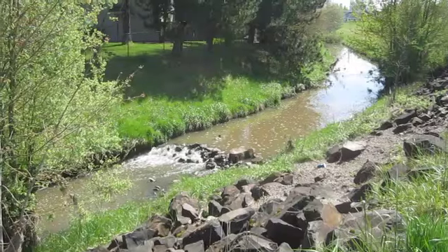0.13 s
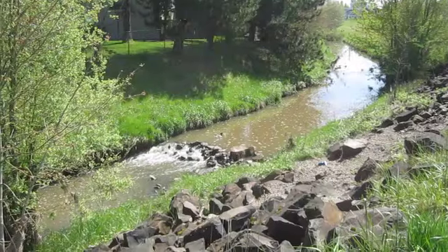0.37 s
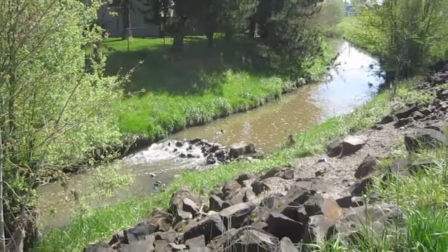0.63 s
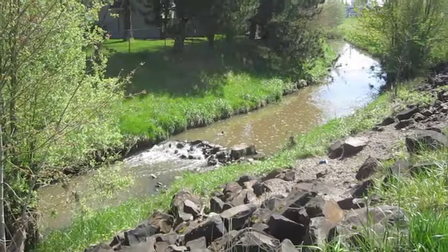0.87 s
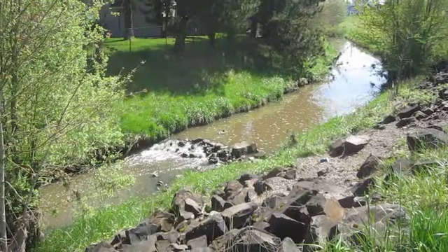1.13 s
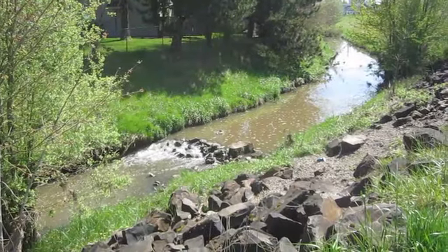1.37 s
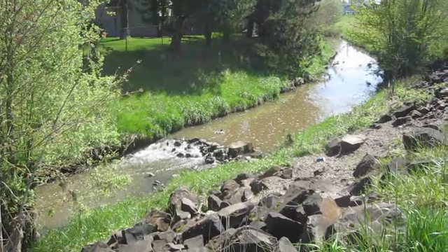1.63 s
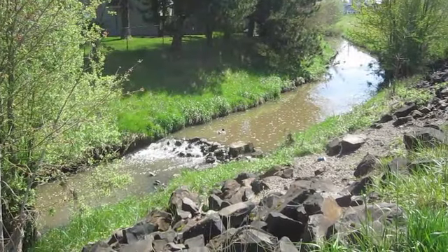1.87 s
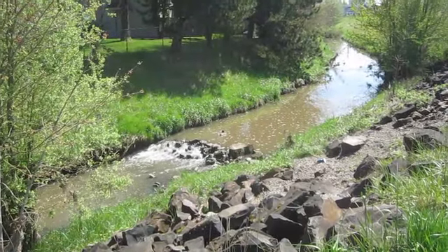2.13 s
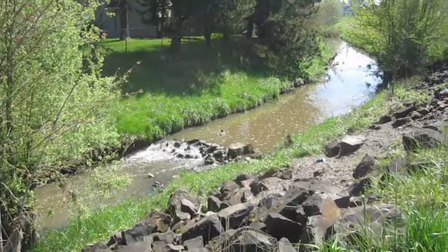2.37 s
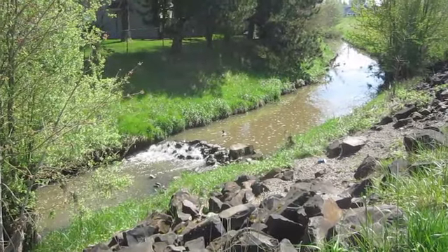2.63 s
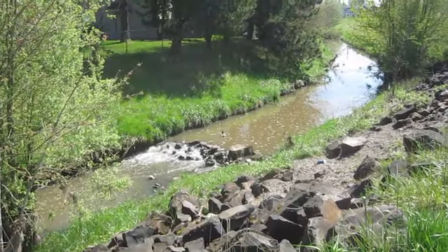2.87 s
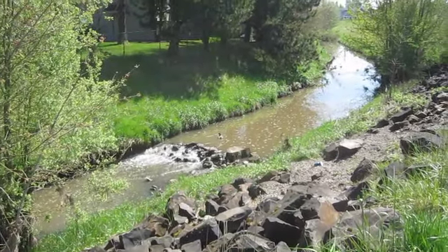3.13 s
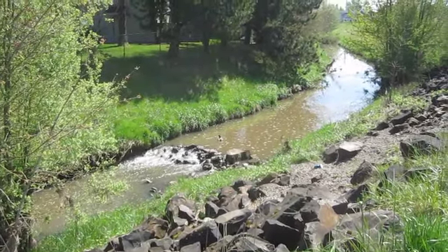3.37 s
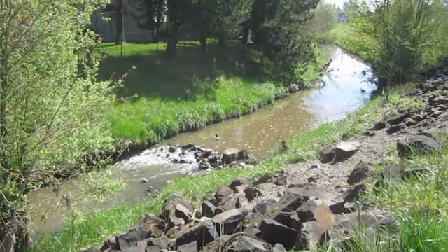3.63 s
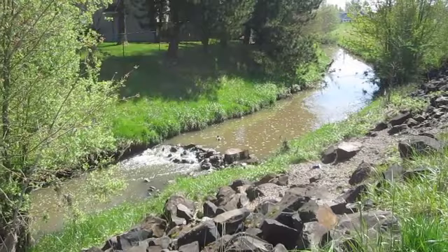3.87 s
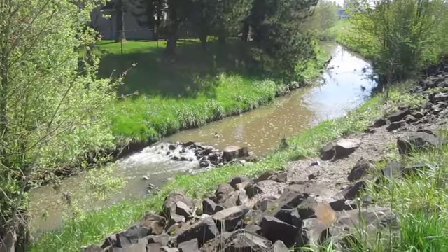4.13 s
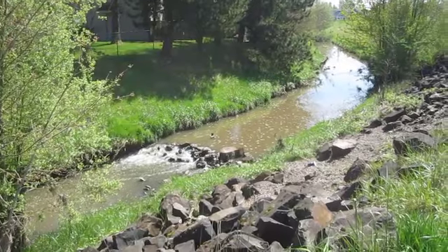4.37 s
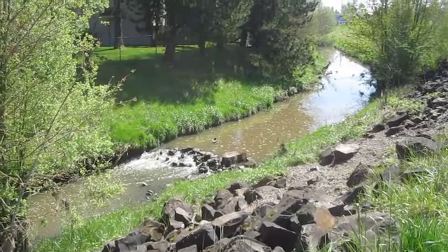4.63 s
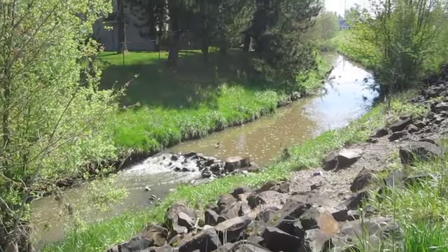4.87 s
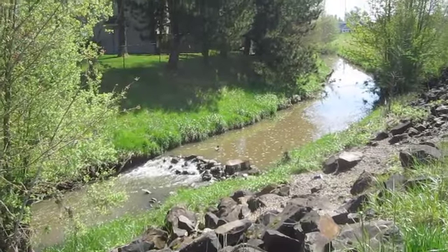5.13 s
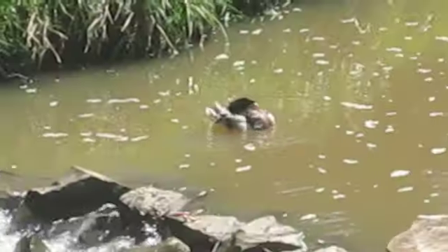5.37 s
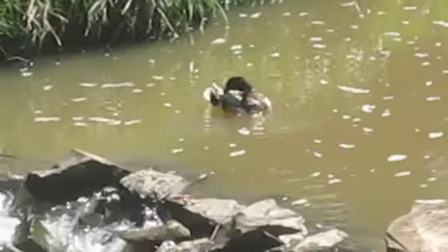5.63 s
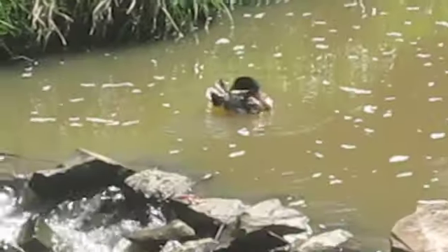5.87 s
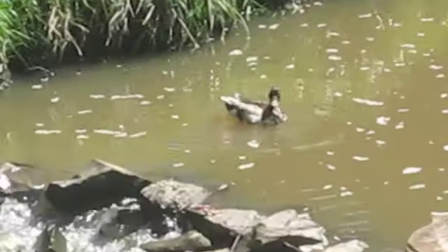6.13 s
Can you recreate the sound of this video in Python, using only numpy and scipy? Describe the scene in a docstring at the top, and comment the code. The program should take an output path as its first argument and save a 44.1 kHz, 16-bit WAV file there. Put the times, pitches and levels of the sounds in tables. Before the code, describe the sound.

Constant rushing water with patchy hiss and small bubble tones, at moderate distance in open air. Soft low wind buffets come mostly in the first second, with sparse tiny clicks later. A hard cut leaves a tenth of a second silent. The final second keeps the water but is dominated by very close handling noise: sharp knocks, snaps, ticks and gritty rubbing, with heavier low wind puffs. Mono, slightly dull top end.

```python
"""Creek over a rocky riffle

A creek rushes over a small rocky riffle, in mono from the bank: patchy noise, damped bubble tones and fizz.
A breeze on the microphone adds low, lumpy noise and short bursts of turbulence.
After a tenth of a second of silence a second stretch follows: the same water, stronger puffs, and a dense
crackle close by, probably the plastic housing creaking in the hand: stick-slip knocks, ticks and snaps."""
import sys
import numpy as np
from scipy import signal
from scipy.fft import rfft, irfft, next_fast_len
from scipy.io import wavfile
from scipy.ndimage import uniform_filter1d, map_coordinates

SR = 44100
rng = np.random.default_rng(int(sys.argv[2]) if len(sys.argv) > 2 else 0)


def int16_out(signal):
    """Quantize to a 16-bit WAV file."""
    q = np.round(np.clip(np.atleast_2d(signal).T, -1, 1) * 32767)
    wavfile.write(sys.argv[1], SR, q.astype(np.int16))


def voltage_ratio(decibels):
    """Convert decibels (scalar or array-like) to amplitude ratios, 20 dB per decade."""
    exponent = np.asarray(decibels, float) / 20
    return 10 ** exponent


N = 275757  # length in samples

# stretches in which the microphone is live: start t/s, end t/s
LIVE_STRETCHES = [(0.0945, 5.2615), (5.3935, 6.3)]
# colour of the riffle: f/Hz, level per hertz/dB
RIFFLE_SPECTRUM = [(200, -45.5), (300, -19.5), (410, -10), (600, -15.5), (885, -4), (1090, -2),
                   (1350, -2.5), (1600, -6.5), (1820, -12.5), (2200, -6.5), (2850, -11.5), (3400, -6),
                   (4000, -11), (4600, -11), (5250, -15.5), (6800, -14.5), (10500, -19.5)]
# the clearest single bubbles: t/s, level/dB, f/Hz
CLEAR_BUBBLES = [(3.436, -14.5, 960), (5.054, -18, 1100)]
# breeze on the microphone: t/s, level/dB
BREEZE_LEVEL = [(0.3, -37), (0.42, -45.5), (0.62, -41), (0.96, -38), (1.3, -45), (5.05, -43), (5.65, -36),
                (5.9, -40.5), (6.25, -31)]
# colour of the breeze: f/Hz, level per hertz/dB
BREEZE_SPECTRUM = [(12, -30), (25, -6.5), (55, 0), (110, 1.5), (190, -1), (280, -7.5), (370, -28),
                   (600, -56)]
# the strongest puffs: centre t/s, level/dB, half length/ms
STRONG_PUFFS = [(0.2, -29.5, 12), (0.275, -30.5, 10.5), (0.549, -26, 23), (0.641, -34, 5.6),
                (0.671, -32.5, 9.4), (0.753, -23, 3.1), (0.847, -28, 14), (0.882, -30, 4.5),
                (0.943, -34.5, 7.4), (1.0, -28, 8.9), (1.134, -33.5, 7), (2.448, -38, 7.7),
                (2.799, -34.5, 13), (5.415, -19, 14.6), (5.498, -20.5, 14), (5.53, -29, 8),
                (5.606, -34, 16), (5.695, -23, 11), (5.859, -29, 3.7), (5.906, -32.5, 26), (5.959, -23, 13),
                (6.076, -26, 7.2), (6.108, -23, 7), (6.175, -23.5, 6), (6.198, -17.5, 9),
                (6.225, -22.5, 25)]
# the clearest creaks of the housing: t/s, knock level/dB, tick level/dB, tick f/Hz
CLEAR_CREAKS = [(0.403, -33, -20, 7200), (1.791, -34, -15, 7400), (2.36, -32, -11, 4500),
                (2.888, -30, -16, 7400), (3.109, -33, -14.5, 7800), (3.269, -34, -15, 5940),
                (3.79, -31, -13, 8450), (5.418, -13, -3, 4600), (5.4442, -12, 0.5, 9400),
                (5.4582, -9.5, -4.5, 7100), (5.4747, -9.5, -7, 4660), (5.4977, -15, -1.5, 7660),
                (5.4999, -19, 0.5, 6340), (5.5207, -7.5, -18, 4500), (5.5246, -5, -7, 4800),
                (5.5438, -15, -4.5, 9100), (5.5588, -5, -14.5, 4300), (5.5717, -17, -4, 4220),
                (5.5754, -20, -10, 3500), (5.5819, -17, -2, 4740), (5.6019, -19, -5, 3900),
                (5.6077, -3.5, -21, 3500), (5.6161, -28, -5.5, 9160), (5.6324, -8, -1.5, 4800),
                (5.6449, -26, 2, 9200), (5.6875, -5, -10, 4300), (5.7083, -14, -6.5, 7550),
                (5.7341, -7.5, -9.5, 3900), (5.7534, -20, -10.1, 9000), (5.7822, -13, 0.5, 9200),
                (5.785, -22.5, 2.1, 7000), (5.8002, -23, -2, 7100), (5.8264, -15, 0.5, 9900),
                (5.8588, -15, -12, 6600), (5.8627, -7, -15, 3530), (5.9142, -14, -0.5, 7800),
                (5.9231, -6, -0.5, 7000), (5.9307, -10, -18, 6740), (5.9633, -21, -5, 6930),
                (5.978, -6.5, -4.5, 3200), (5.9991, -5, -11, 3500), (6.0346, -8, -4, 5550),
                (6.0709, -13, -11, 4600), (6.0739, -16, -14, 8500), (6.0797, -3.5, -9.5, 4000),
                (6.1029, -7.5, -16, 3500), (6.1215, -19, -3.5, 6800), (6.1302, -26, -8, 6900),
                (6.2123, -9, -11, 6500), (6.2432, -2, -18, 4700)]
# rubbing of the hand between the creaks: t/s, level/dB
RUBBING_LEVEL = [(5.4, -32), (5.43, -24), (5.62, -23), (5.67, -24.5), (5.8, -26), (5.9, -22), (6.0, -25.5),
                 (6.1, -20), (6.17, -26), (6.25, -21)]
# resonances of the housing: f/Hz, width/Hz, level/dB
HOUSING_MODES = [(1700, 1600, -13), (2395, 370, 2.5), (3270, 2350, -8), (4600, 1030, -3), (7000, 1430, -7),
                 (10130, 1600, -9.5)]


def unit(x):
    """Normalisation: a signal divided by its root mean square has unit power."""
    return x / np.sqrt(np.mean(x ** 2) + 1e-20)


def curve(rows):
    """Linear interpolation: (t/s, level/dB) rows give a level per sample, each stretch from its own rows."""
    row_s, level_db = np.transpose(rows)
    t = np.arange(N) / SR
    middle_of_gap = (LIVE_STRETCHES[0][1] + LIVE_STRETCHES[1][0]) / 2
    late = row_s > middle_of_gap
    early_db = -120  # practically silent where the first stretch has no rows
    if (~late).any():
        early_db = np.interp(t, row_s[~late], level_db[~late])
    return np.where(t > middle_of_gap, np.interp(t, row_s[late], level_db[late]), early_db)


def wobble(rate):
    """Slow random modulation: a spline through normal deviates, rate knots per second."""
    knots = rng.standard_normal(int(N * rate / SR) + 4)
    return map_coordinates(knots, [np.arange(N) * rate / SR])


def filtered(x, response):
    """Linear filtering: the spectrum is multiplied by a complex response of frequency."""
    m = next_fast_len(N + 8192)
    f = np.fft.rfftfreq(m, 1 / SR)
    return irfft(rfft(x, m) * response(f), m)[..., :N]


def coloured(x, spectrum):
    """Spectral shaping: (f/Hz, level/dB) points joined on a log-frequency axis; the result has unit rms."""
    points_hz, level_db = np.transpose(spectrum)
    gain = lambda f: voltage_ratio(np.interp(np.log(f + 1), np.log(points_hz), level_db))
    return unit(filtered(x, gain))


def rings(s, db, hz, life, rise, length):
    """Free damped oscillation: a decaying sine per row, its pitch rising by the share rise in one life (s)."""
    t = np.arange(length) / SR
    lives = t / life[:, None]
    tone = np.sin(2 * np.pi * hz[:, None] * t * (1 + rise * lives / 2))
    wave = tone * np.exp(-lives) * (1 - np.exp(-6 * lives))  # the last factor softens the onset
    at = np.round(s * SR).astype(int)[:, None] + np.arange(length)
    return np.bincount(at.ravel(), (voltage_ratio(db)[:, None] * wave).ravel(), N + length + SR)[:N]


def swarm(count, lo_hz, hi_hz, cycles, spread_db, rise, length):
    """Shot noise: random damped grains, even on log pitch, a few much larger than the rest; unit rms."""
    when, pitch, size = rng.random((count, 3)).T
    hz = lo_hz * (hi_hz / lo_hz) ** pitch
    db = -spread_db * np.log(1 - .98 * size)
    return unit(rings(when * N / SR, db, hz, cycles / hz, rise, length))


def wash():
    """Turbulent noise: smoothed random gains over time and frequency leave the far wash in patches."""
    z = signal.stft(rng.standard_normal(N + 512), nperseg=512)[2]
    over_frequency = uniform_filter1d(rng.standard_normal(z.shape), 6, 0)
    patches_db = 1.12 * unit(uniform_filter1d(over_frequency, 8, 1))
    return unit(signal.istft(z * voltage_ratio(patches_db), nperseg=512)[1][:N])


def bubbles_and_fizz():
    """Bubble resonance: many damped tones of rising pitch, with shorter and higher ones as fizz."""
    whiten = lambda f: np.sqrt(f / 1000)  # grains even on log pitch fall 3 dB an octave
    bubbles = swarm(count=5000, lo_hz=610.2, hi_hz=4500, cycles=8.22, spread_db=0.5, rise=0.1278, length=900)
    fizz = swarm(count=24000, lo_hz=2504, hi_hz=11500, cycles=1.73, spread_db=4.5, rise=0.038, length=150)
    return voltage_ratio(-11) * unit(filtered(bubbles, whiten)) + voltage_ratio(-8.0) * unit(filtered(fizz, whiten))


def water():
    """Superposition: wash and bursting bubbles share the colour of the riffle, the flow fluttering slightly."""
    flow_db, flutter_db = -26, 0.51  # steady level, and spread of the flutter
    rush = coloured(wash() + bubbles_and_fizz(), RIFFLE_SPECTRUM)
    return voltage_ratio(flow_db + flutter_db * wobble(9)) * rush


def breeze():
    """Wind noise: low-frequency pressure fluctuations on the microphone, their level lumpy."""
    lumps = voltage_ratio(1.9 * wobble(30) + .9 * wobble(4.9))
    rumble = coloured(rng.standard_normal(N), BREEZE_SPECTRUM)
    return voltage_ratio(curve(BREEZE_LEVEL)) * unit(lumps * rumble)


def puffs():
    """Turbulent bursts: band-shaped noise under a Gaussian envelope, higher in pitch when stronger."""
    mid_db, mid_hz, hz_per_db = -28, 104, 5.5  # a puff of middle strength swirls around mid_hz
    width = 1.11  # of the band, in natural-log units of frequency
    out = np.zeros(N)
    t = np.arange(-4096, 4096) / SR
    f = np.fft.rfftfreq(len(t), 1 / SR)
    for s, db, ms in STRONG_PUFFS:
        hz = max(mid_hz + hz_per_db * (db - mid_db), 40)
        band = np.exp(-(np.log((f + 1) / hz) / width) ** 2)
        swirl = irfft(rfft(rng.standard_normal(len(t))) * band)
        shape = np.exp(-(t * 1000 / ms) ** 2)
        puff = swirl * shape
        puff = puff / np.sqrt(np.sum(puff ** 2) / np.sum(shape ** 2))
        at = round(s * SR) + np.arange(len(t)) - len(t) // 2
        out[at[at < N]] += voltage_ratio(db) * puff[at < N]
    return out


def housing_response(f):
    """Modal superposition: second-order resonances of alternating sign sum to the housing's response."""
    total = 0
    for k, (centre, width, db) in enumerate(HOUSING_MODES):
        damping = 1j * f * width
        total = total + (-1) ** k * voltage_ratio(db) * damping / (centre * centre - f * f + damping)
    return total


def creaks():
    """Stick-slip friction: each creak is three slips in a row, each a knock, a jolt, a tick and a snap."""
    slip_gap_s, slip_loss_db = .0011, 6  # mean gap, and mean loss from one slip to the next
    snap_db = 6  # impulse over tick, before the housing's resonances
    mean_knock_hz, knock_scatter = 2330, 0.073  # scatter in natural-log units
    jolt_db, jolt_hz = -0.5, 1560  # blunt jolt: level over the knock, pitch of the first slip
    rows = np.vstack([CLEAR_CREAKS, lesser_creaks()])
    s, knock_db, tick_db, tick_hz = np.repeat(rows, 3, axis=0).T
    knock_hz = np.repeat(mean_knock_hz * np.exp(knock_scatter * rng.standard_normal(len(rows))), 3)
    slip = np.arange(len(s)) % 3
    late, size, detune = rng.standard_normal((len(s), 3)).T
    s = s + slip * slip_gap_s * (1 + .25 * late)
    fall_db = -slip * slip_loss_db + 1.9 * size * (slip > 0)
    bend = 1 + 0.19 * detune * (slip > 0)  # later slips are detuned
    bent_jolt_hz = jolt_hz * bend
    knock = rings(s, knock_db + fall_db, knock_hz, 1.9 / knock_hz, 0, length=500)
    jolt = rings(s, knock_db + fall_db + jolt_db, bent_jolt_hz, 0.38 / bent_jolt_hz, 0, length=120)
    tick = rings(s, tick_db + fall_db, tick_hz * bend, 3.96 / tick_hz, 0, length=200)
    impulses = voltage_ratio(tick_db + fall_db + snap_db) * np.sign(late)  # random polarity
    snaps = np.bincount(np.round(s * SR).astype(int), impulses, N)[:N]
    return knock + jolt + tick + filtered(snaps, housing_response)


def clear_bubbles():
    """Bubble resonance: a few isolated damped tones, rising slightly, stand clear of the rush."""
    s, db, hz = np.transpose(CLEAR_BUBBLES)
    return rings(s, db, hz, 7 / hz, 0.021, length=1500)


def lesser_creaks():
    """Random stick-slip events: rows like those of the clear creaks, their levels following the rubbing."""
    count, over_rub_db, scatter_db = 32, 7, 4
    lo_hz, hi_hz = 3500, 8500  # range of tick pitch
    when, pitch, a, b = rng.random((count, 4)).T
    rub_s, rub_db = np.transpose(RUBBING_LEVEL)
    s = rub_s[0] + when * (rub_s[-1] - rub_s[0])
    db = np.interp(s, rub_s, rub_db) + over_rub_db
    knock_db = db + scatter_db * (2 * a - 1)
    tick_db = db + scatter_db * (2 * b - 1)
    return np.transpose([s, knock_db, tick_db, lo_hz * (hi_hz / lo_hz) ** pitch])


def rubbing():
    """Friction noise: thousands of tiny slips, each at its own pitch, come in clumps and excite the housing."""
    grit = swarm(count=7000, lo_hz=1350, hi_hz=11200, cycles=1.33, spread_db=2, rise=0, length=160)
    clumped = grit * voltage_ratio(2.6 * wobble(110))
    whitened_modes = lambda f: housing_response(f) * np.sqrt(f / 2000)
    return voltage_ratio(curve(RUBBING_LEVEL)) * unit(filtered(clumped, whitened_modes))


def scene():
    """Superposition of pressures: every source adds at one microphone, the same in both channels."""
    mono = water() + breeze() + puffs() + creaks() + clear_bubbles() + rubbing()
    return np.tile(mono, (2, 1))


def roll_off(x):
    """The treble ends steeply here."""
    return signal.sosfilt(signal.butter(12, 12220, fs=SR, output="sos"), x)


def record(dry):
    """Gating, band limiting and saturation: stretches start at once and end with a drop and a quick fade."""
    top_hz, overload = 10960, 0.82  # upper band edge, and amplitude where the peaks saturate
    t = np.arange(N) / SR
    live = np.zeros(N)
    for start, end in LIVE_STRETCHES:
        fade = voltage_ratio(-8 - 900 * (t - end)) * (t < end + .035)  # drop of 8 dB, then 900 dB per second
        live += (t >= start) * np.where(t < end, 1, fade)
    narrow = filtered(dry * live, lambda f: np.clip((top_hz - f) / 120, 0, 1))
    narrow = narrow * (live > 0)  # no filter ringing in the silence
    limited = narrow / (1 + np.abs(narrow / overload) ** 7) ** (1 / 7)
    return roll_off(limited)


dry = scene()
out = record(dry)
int16_out(out)
```